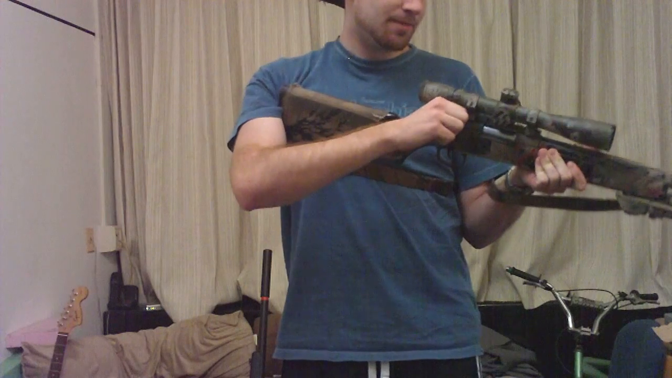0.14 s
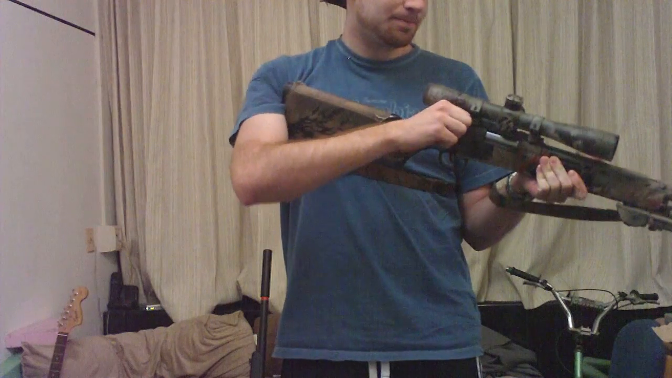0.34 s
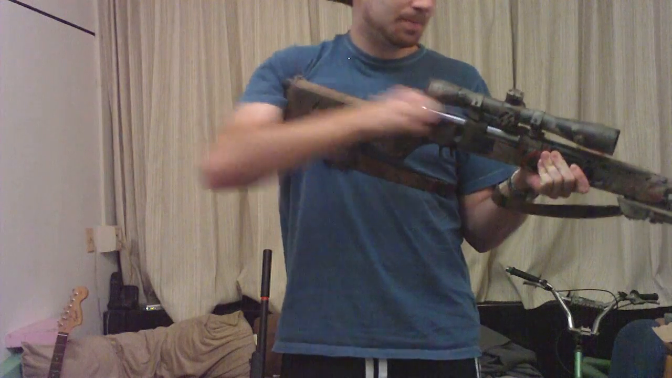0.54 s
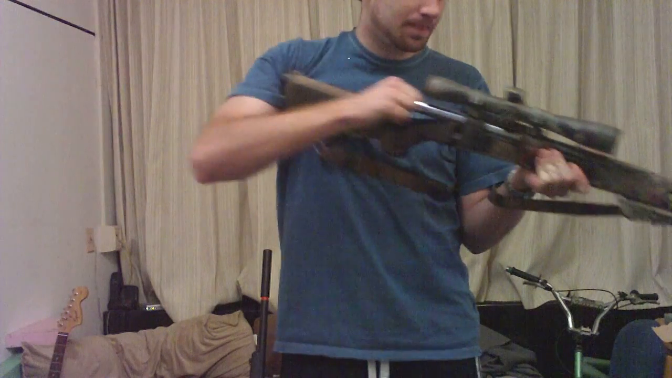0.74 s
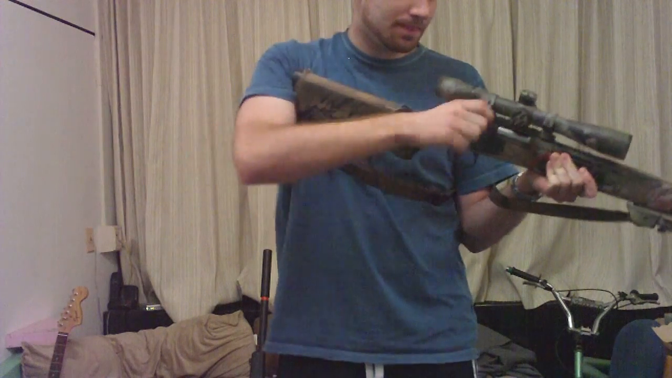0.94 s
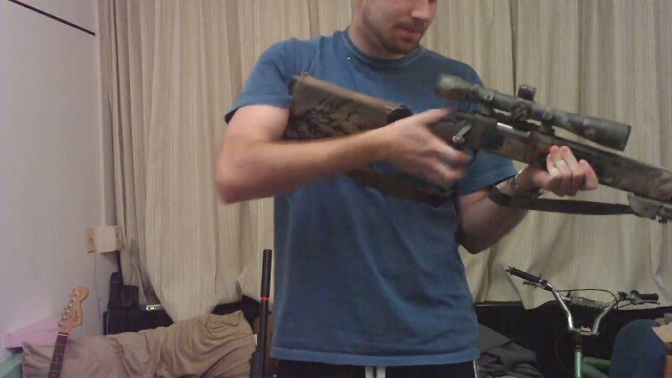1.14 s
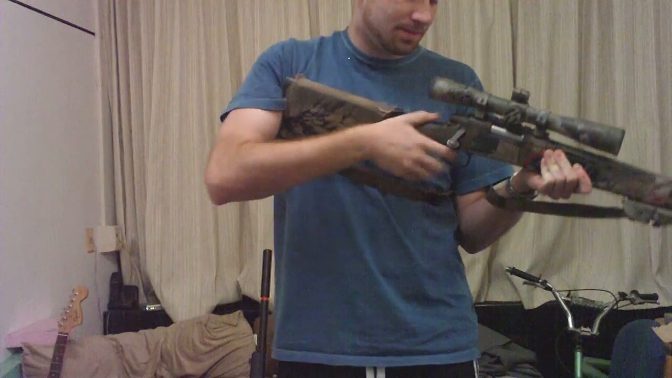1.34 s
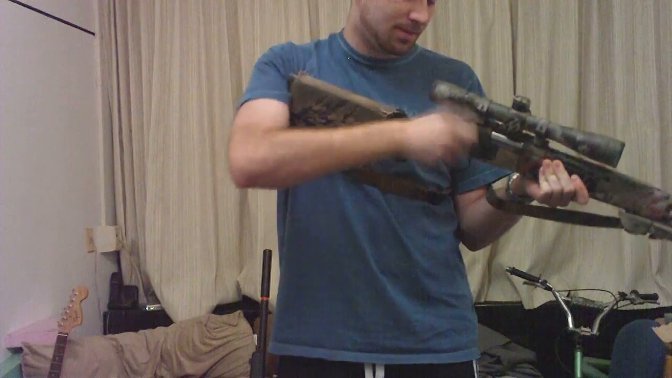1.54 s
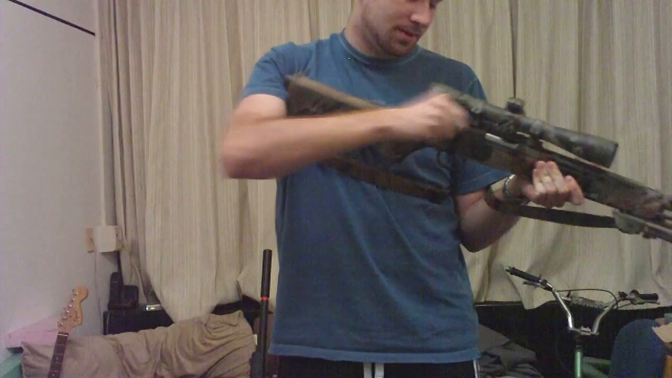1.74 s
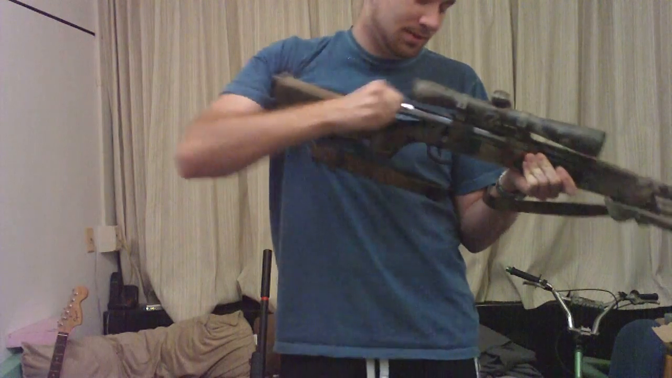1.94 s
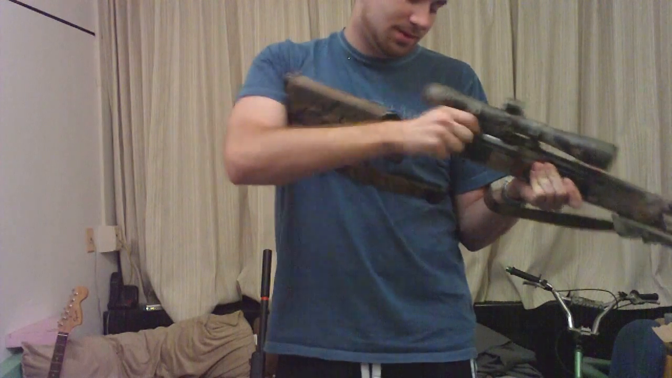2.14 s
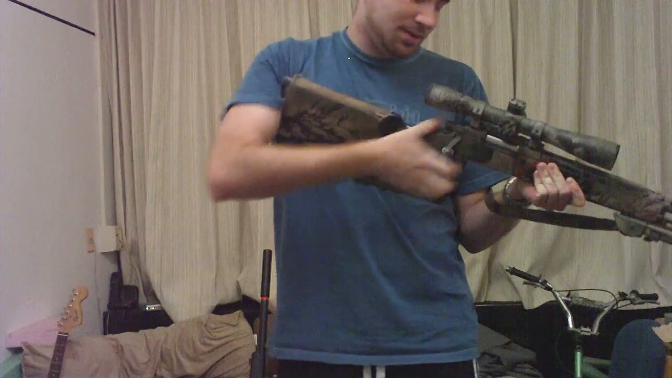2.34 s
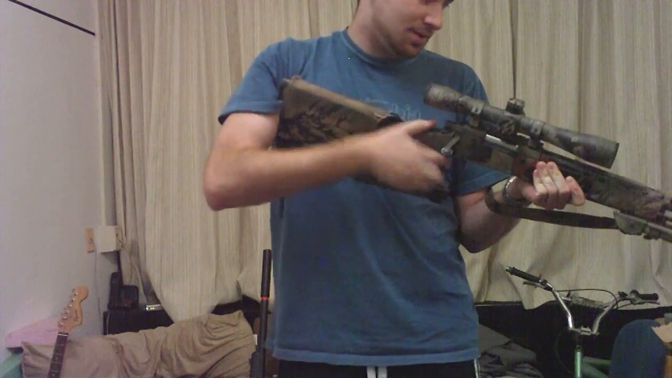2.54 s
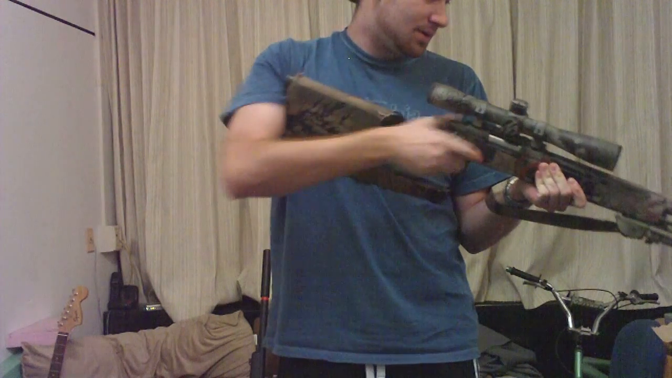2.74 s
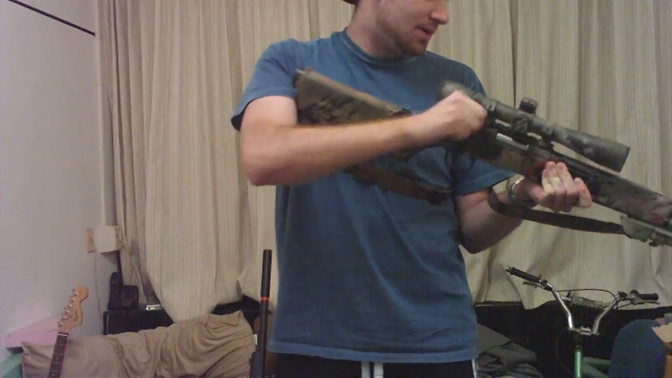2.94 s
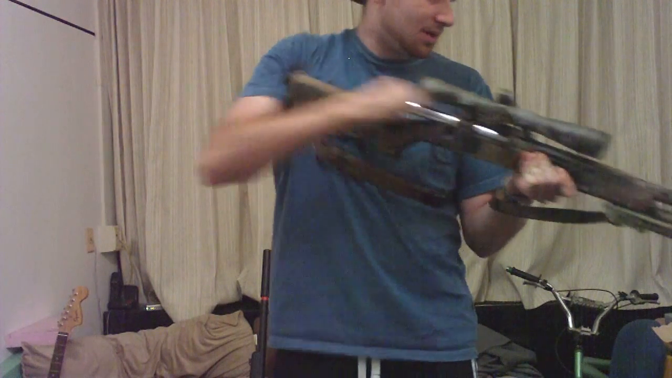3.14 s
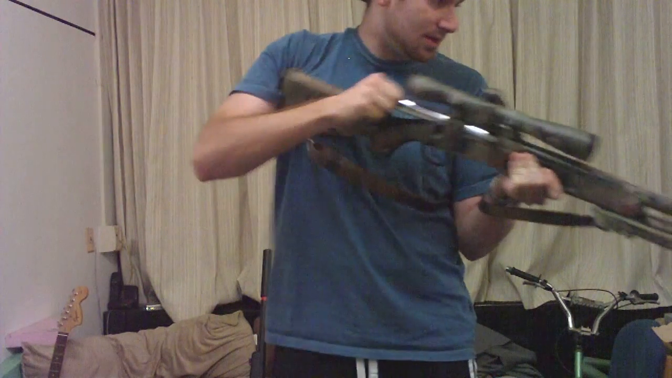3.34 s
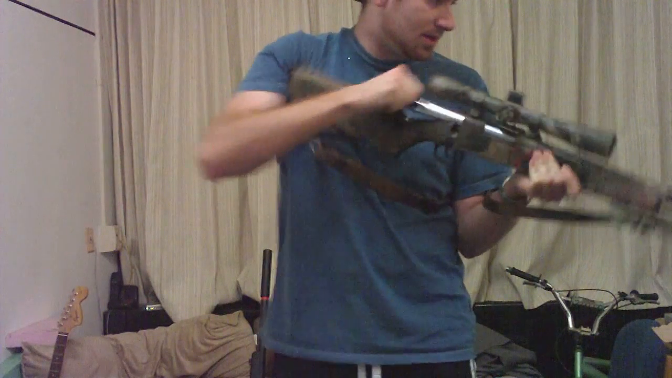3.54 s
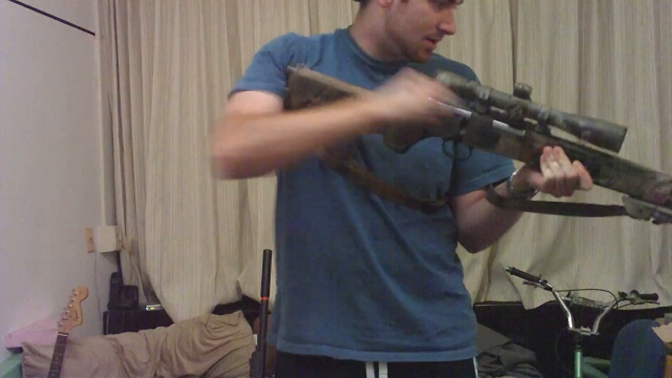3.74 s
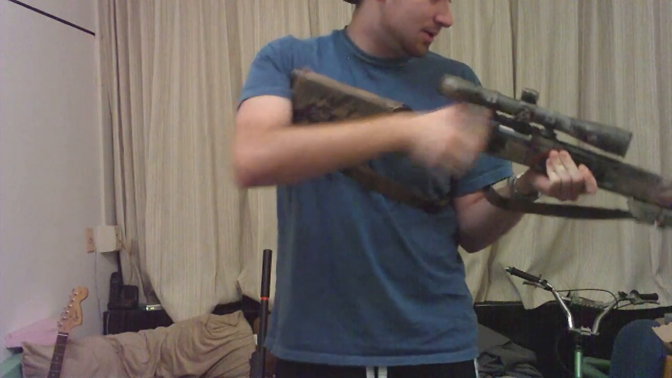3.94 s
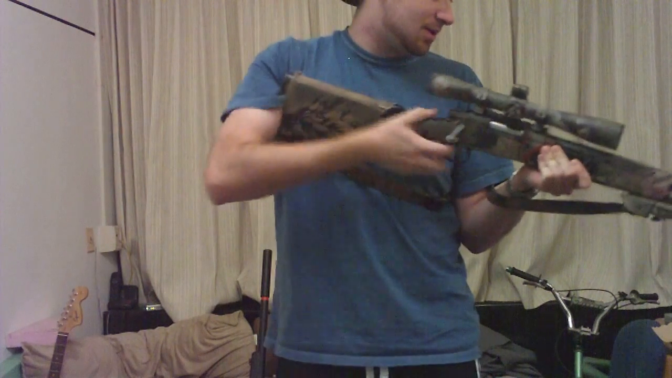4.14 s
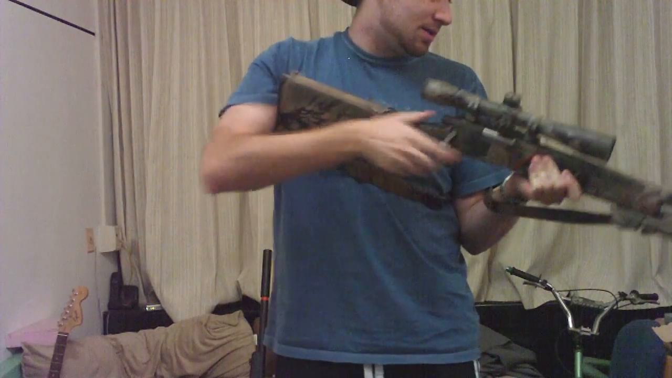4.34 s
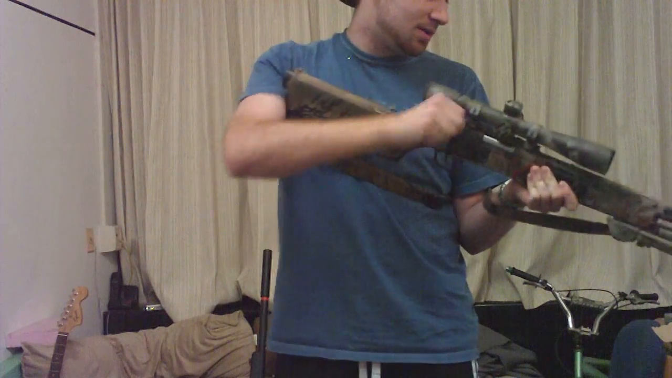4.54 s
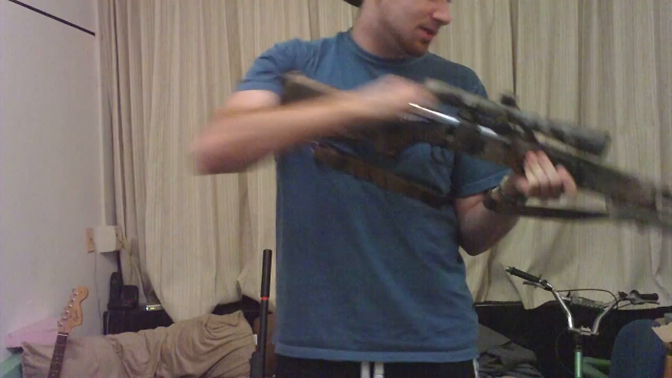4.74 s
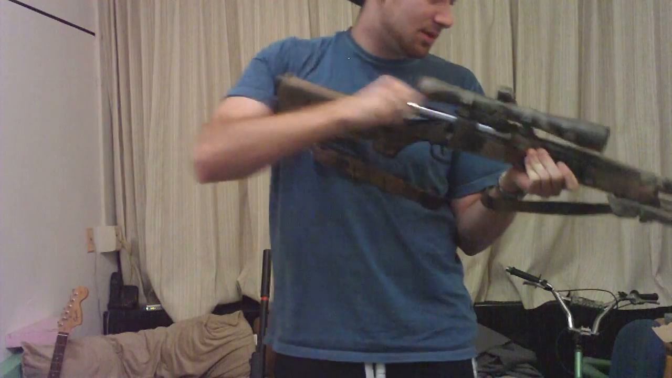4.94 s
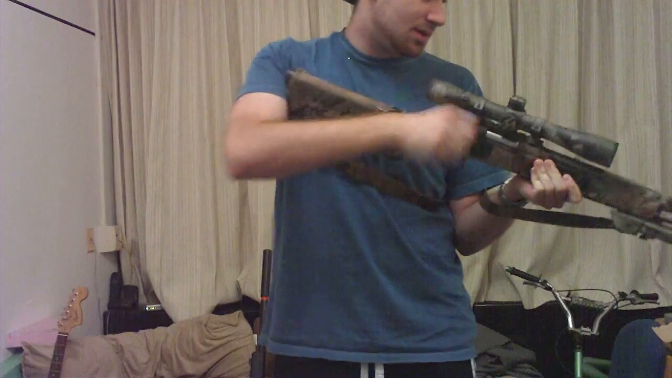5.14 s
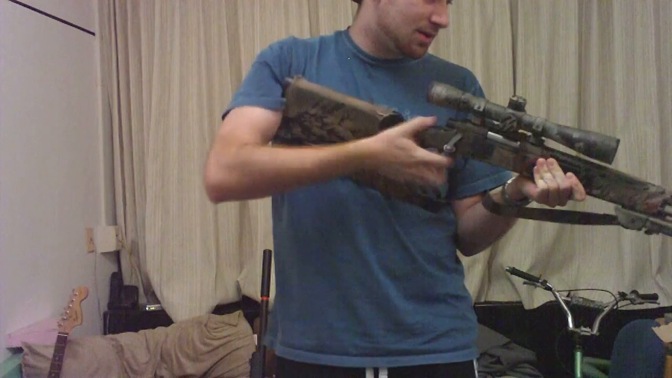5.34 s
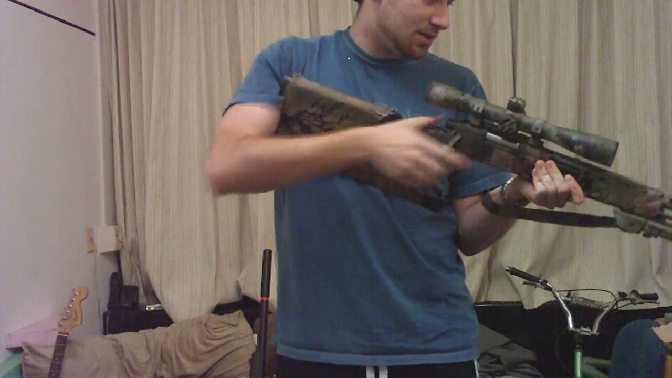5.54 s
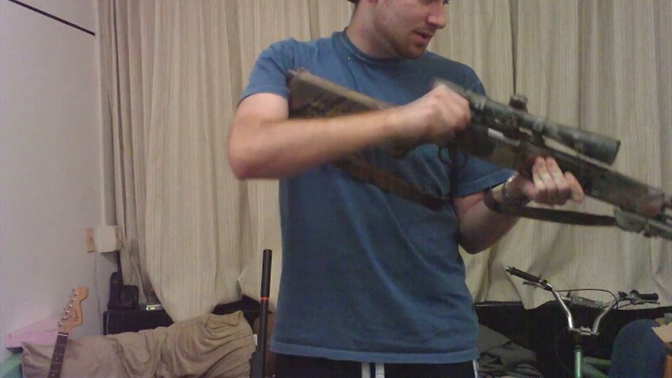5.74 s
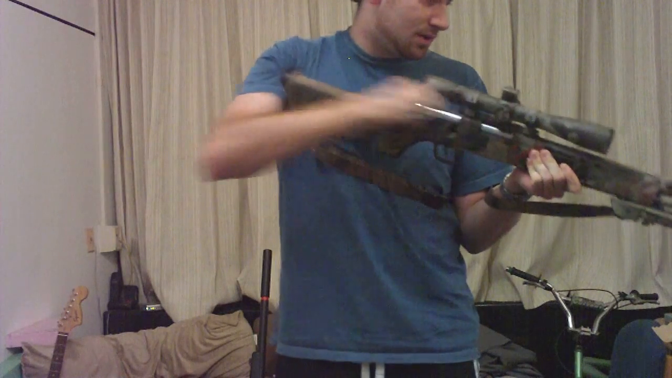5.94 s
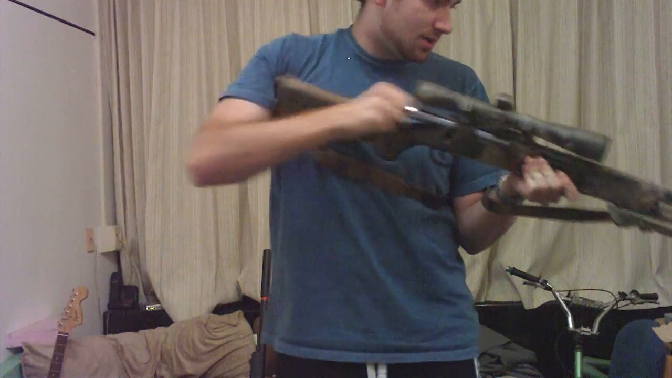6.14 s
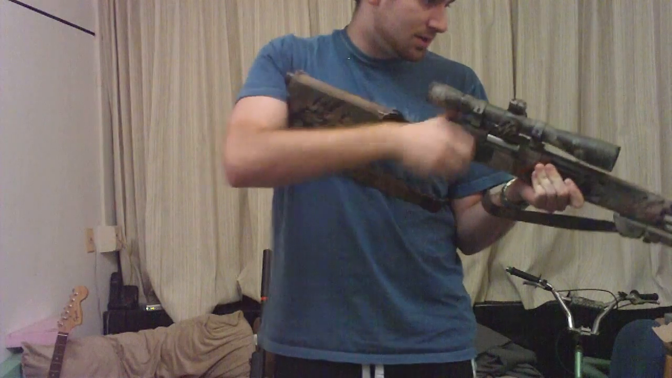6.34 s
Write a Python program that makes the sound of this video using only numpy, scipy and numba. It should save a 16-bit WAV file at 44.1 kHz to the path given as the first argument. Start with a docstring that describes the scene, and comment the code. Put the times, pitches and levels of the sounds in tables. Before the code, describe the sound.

Fast, rhythmic metal-and-plastic rifle handling close to a cheap camera microphone: bolt lifted, rasped back, clicked, pushed home and turned down with a clack, then a cracking spring-piston snap and a trigger click just after. Four shots come a little over a second apart, and a fifth cocking ends it unfired. Short room reflections, faint cloth rustle, steady hiss and a faint electronic whine surround them.

```python
"""In a curtained bedroom, a spring-powered bolt-action airsoft rifle is cocked and fired again and again.
The bolt scrapes against the spring, knocks at its stops and locks; the piston snaps forward at each shot.
Blows and scrapes are bursts of noise that make the stock and bolt ring; sleeves rustle and the walls answer.
Behind them lie house rumble, hiss and the whine of the small camera whose microphone hears it all."""
import sys
import numpy as np
from scipy import signal
from scipy.fft import rfft, irfft
from scipy.io import wavfile
from scipy.ndimage import uniform_filter1d
from numba import njit

SR = 44100
rng = np.random.default_rng(int(sys.argv[2]) if len(sys.argv) > 2 else 0)


def output_pcm(signal):
    """Save a mono or channel-first signal as 16-bit PCM at the path in sys.argv[1].

    Samples are clipped to [-1, 1] before scaling.
    """
    pcm = np.clip(np.atleast_2d(signal).T, -1, 1) * 32767
    wavfile.write(sys.argv[1], SR, np.round(pcm).astype(np.int16))


N = 282397  # length of the scene [samples]


def undb(db):
    """Turn decibels into a gain."""
    return 10 ** (np.asarray(db) / 20)


def unit(x):
    """Scale to an rms of 1."""
    return x / np.sqrt(np.mean(x ** 2))


def hiss():
    """Plain white noise, as long as the scene."""
    return rng.standard_normal(N)


def colour(x, points):
    """Shape the tone by (frequency [Hz], gain [dB]) points, with a filter that never sounds early."""
    hz, db = np.transpose(points)
    bins = np.maximum(np.arange(len(x) // 2 + 1) * SR / len(x), 1)
    log_gain = np.interp(np.log(bins), np.log(hz), db) * np.log(10) / 20
    ceps = irfft(log_gain, len(x))
    # fold the cepstrum so that the response starts at time zero
    ceps[1:len(x) // 2] *= 2
    ceps[len(x) // 2 + 1:] = 0
    return irfft(rfft(x) * np.exp(rfft(ceps)), len(x))


def band(x, hz, width_hz):
    """One resonance, with gain 1 at its centre."""
    return signal.lfilter(*signal.iirpeak(hz, hz / width_hz, SR), x)


def band_twice(x, hz, width_hz):
    """The same resonance twice over, for steeper sides, scaled to rms 1."""
    return unit(band(band(x, hz, width_hz), hz, width_hz))


@njit
def glide(x, hz, width):
    """A resonance whose centre moves: a state-variable band-pass filter."""
    y, b, l = np.empty(len(x)), 0., 0.
    for i in range(len(x)):
        g, k = np.tan(np.pi * hz[i] / SR), width / hz[i]
        v = (b + g * (x[i] - l)) / (1 + g * (g + k))
        b, l, y[i] = 2 * v - b, l + 2 * g * v, k * v
    return y


def ring(force, shape):
    """Make an object ring: convolve the force with its impulse response."""
    return signal.fftconvolve(force, shape)[:len(force)]


def walk(rate):
    """Slow random wander: levels held for 1 / rate seconds, then smoothed twice."""
    k = int(SR / rate)
    steps = np.repeat(rng.standard_normal(N // k + 1), k)
    return uniform_filter1d(uniform_filter1d(steps, k), k)[:N]


def grit(spread_db):
    """Many tiny contacts of uneven size, rms 1."""
    return unit(hiss() * undb(spread_db * rng.exponential(size=N)))


def rifle():
    """Sum the rifle's sounds; so slim an object sends out little bass from its blows and strokes."""
    slim = signal.butter(4, 275, "high", fs=SR, output="sos")
    return signal.sosfilt(slim, hits() + strokes() + cylinder_head()) + barrel_puff() + recoil()


# The shots: (time of the slam [s], crack [dB], stock ring [dB re crack], bolt ring [dB re crack])
SHOTS = [(1.3135, -7, -14, -19.5), (2.576, -7.5, -11.5, -18), (4.234, -7.5, -12, -18),
         (5.4461, -8, -13.5, -14)]
# Blows inside one shot, from sear release over piston slam to rebounds:
# (time from the slam [ms], level [dB re the shot's crack], rise [ms], contact [ms])
PISTON = [(-6, -9, 1.4, 9.9), (-3.5, 0, 0.2, 1.5), (0.5, -6, 1.5, 3.8), (7, -1, 0.49, 3),
          (17, -22, 0.79, 15), (42.5, -1.5, 1, 3.3), (61, -12.5, 2.32, 10.4)]
SPRING_DB, SPRING_T60_S = -14, 0.39  # level re the shot's crack, time to fade by 60 dB


def shot_blows():
    """Each shot is a chain of piston blows, then the mainspring rattling in the cylinder."""
    rows = []
    spring_contact_ms = SPRING_T60_S * 1000 / np.log(1000)
    for s, db, stock_db, bolt_db in SHOTS:
        for ms, blow_db, rise, contact in PISTON:
            rows.append((s + ms / 1000, db + blow_db, stock_db, bolt_db, 2000, rise, contact))
        rows.append((s, db + SPRING_DB, stock_db, bolt_db, 1800, 3, spring_contact_ms))
    return rows


# Each kind of knock in the bolt cycle has one voice: (stock ring [dB re crack], rise [ms], contact [ms])
# and its rows: (time [s], crack [dB], bolt ring [dB re crack], bolt ring centre [Hz])
HANDLE_TICK = (-35, 0.54, 5.1), [(0.4534, -45, -6, 2520), (1.6434, -37.5, 0.5, 4330),
               (2.9309, -34, -3, 4160), (4.593, -37.5, -2, 4300), (5.7943, -29, -19, 3250)]
HANDLE_UP = (-4, 1.45, 3.55), [(1.6661, -23.5, -27, 1240), (2.9664, -35.5, -0.5, 1660),
             (4.6186, -27, -18, 1720), (5.8108, -25.5, -14, 1085)]
BOLT_FREE = (-17, 0.9, 11), [(0.5162, -32, -20, 3250), (1.8305, -25.5, -8, 3060),
             (3.1365, -24.5, -6.5, 3330), (4.7541, -33, -10.5, 1680), (5.9648, -31, -10, 3960)]
SEAR_CATCH = (-27.5, 0.68, 3.1), [(0.6774, -9, -16, 1240), (1.9075, -19.5, -7.5, 3170),
              (1.9422, -13.5, -7.5, 4380), (3.261, -13.5, -8, 3480), (4.8424, -17, -18, 3900),
              (4.868, -8.5, -8, 3870), (6.0659, -16.5, -13, 2670), (6.082, -10, -11, 2800)]
REAR_RELEASE = (-76, 0.92, 4.64), [(0.7828, -14, -10, 1370), (2.0379, -11.5, -10, 1520),
                (3.6307, -13.5, -9, 1550), (3.7315, -17, -8.5, 2610), (4.9574, -16.5, -11.5, 1680),
                (6.1771, -15, -15.5, 1590)]
LUG_MEET = (-54, 1, 11.1), [(0.9412, -18.5, -10.5, 3270), (2.1742, -20, -15, 2730),
            (3.8664, -14.5, -6.5, 3470), (5.1072, -21.5, -8.5, 2020), (6.3197, -19, -11, 1710)]
BOLT_HOME = (-22.5, .5, 4.1), [(0.9577, -13, -13, 1250), (2.1875, -27.5, 2.5, 3640),
             (3.8787, -9.5, -19, 2850), (3.8849, -14.5, -12, 1240), (5.1232, -11.5, -13.5, 3250),
             (6.335, -10, -14.5, 3020)]
HANDLE_DOWN = (-3, 0.8, 4.1), [(1.111, -7.5, -17, 2400), (2.3472, -7, -16.5, 2940),
               (4.044, -7.5, -25.5, 1800), (5.2774, -10.5, -12.5, 2500)]
TRIGGER_RESET = (-49, 0.53, 3.75), [(1.4508, -15, -16, 1670), (2.6857, -15, -15, 1660),
                 (4.3634, -13, -17.5, 1710), (5.5831, -14.5, -16.5, 1635)]
LOOSE_PART = (-14, .45, 4.4), [(1.2338, -40, -6, 1710), (1.6024, -45, -10, 2570),
              (2.0093, -29.5, -18, 2800), (2.1163, -31, -15, 1520), (2.4267, -32, -6.5, 1720),
              (3.3401, -33, -8, 1350), (3.6584, -22.5, -23, 1440), (3.8214, -35, -20, 3830),
              (4.5194, -48, -11, 1550), (5.746, -42.5, -14, 1710), (5.9474, -45, -4, 1730)]
# Light grazes of a part on its seat: (time [s], crack [dB])
TOUCHES = [(0.7795, -21), (1.102, -38), (2.036, -14.5), (2.3423, -34), (2.527, -49), (2.957, -33),
           (3.627, -19), (3.729, -23.5), (4.033, -40), (4.614, -37), (4.954, -24.5), (5.266, -36),
           (5.342, -25.5), (6.175, -23)]


def cycle_blows():
    """Knocks and light touches as the bolt is worked, each kind with its own hardness."""
    kinds = (HANDLE_TICK, HANDLE_UP, BOLT_FREE, SEAR_CATCH, REAR_RELEASE,
             LUG_MEET, BOLT_HOME, HANDLE_DOWN, TRIGGER_RESET, LOOSE_PART)
    rows = [(s, db, -25, -9, 2500, .8, 2.5) for s, db in TOUCHES]
    for (stock_db, rise, contact), table in kinds:
        rows += [(s, db, stock_db, bolt_db, hz, rise, contact) for s, db, bolt_db, hz in table]
    return rows


GRIP_T60_S = .014  # hands and shoulder let no mode ring longer


def modes_of(table, gain=1, shift=1):
    """How an object answers a kick: damped sine waves added up, unit energy."""
    hz, db, t60 = np.transpose(table)[:, :, None]
    t = np.arange(SR // 20) / SR
    fade = 1000. ** (-t / np.minimum(t60, GRIP_T60_S))
    shape = np.sum(gain * undb(db) * np.sin(2 * np.pi * hz * shift * t) * fade, axis=0)
    return shape / np.sqrt(np.sum(shape ** 2))


# Ringing modes of the stock: (frequency [Hz], relative level [dB], 60 dB fade before the grip's limit [s])
STOCK = [(313, -58, 0.016), (432, -28, 0.059), (530, -5.5, 0.014), (630, 5.5, 0.0067), (800, -33, 0.025),
         (939, 23.5, .03), (1148, 14.5, 0.016)]


def stock_ring(force):
    """The stock rings at its own fixed pitches."""
    return ring(force, modes_of(STOCK))


# Ringing modes of the bolt: (frequency [Hz], relative level [dB], 60 dB fade before the grip's limit [s])
BOLT = [(1330, 20, 0.018), (1640, 18.5, 0.014), (1773, 5.5, 0.059), (2205, 14, 0.0041), (2560, 7.5, 0.045),
        (3270, 14.5, 0.06), (3700, -23.5, 0.045), (4010, -0.5, 0.06), (4096, 7.5, 0.031), (5380, 9, 0.06)]
REACH_OCT = 0.58  # how far from its ring centre a blow still wakes the bolt's modes [octaves]
DETUNE = .02  # each blow lands elsewhere and shifts the modes by about this share


def bolt_ring(force, centre_hz):
    """The bolt rings mostly at the pitches near the place the blow lands."""
    octaves = np.log2(np.array(BOLT)[:, :1] / centre_hz)
    near = 0.024 + np.exp(-(octaves / REACH_OCT) ** 2)
    shift = 1 + DETUNE * rng.standard_normal((len(BOLT), 1))
    return ring(force, modes_of(BOLT, near, shift))


# Tone of the bare crack: (frequency [Hz], relative level [dB])
CRACK = [(800, -79), (1500, -15.5), (2200, -4), (3000, 1), (4200, -0.5), (5500, 3), (6500, 0.5), (7600, -2),
         (8600, -7), (10500, -12), (13000, -23), (15500, -32)]
CHATTER_DB, CHATTER_MS = -20.5, 14  # loose parts rattle on after each blow: level, decay time
STRIKE_DB = 16  # first instant of contact, a single kick to the modes, re the blow
COUPLE_DB = -8.5  # the stock hands part of its blow on to the bolt


def hits():
    """Every blow is a burst of rough contact that cracks, rings the stock and rings the bolt."""
    crack, stock, bolt = np.zeros((3, N + SR))
    ms = np.arange(SR // 2) * 1000 / SR
    contact = np.tile(grit(2.54), 2)
    rattle = np.tile(unit(undb(7.0 * walk(250))), 2)
    for s, db, stock_db, bolt_db, hz, rise_ms, contact_ms in shot_blows() + cycle_blows():
        at = slice(int(s * SR), int(s * SR) + len(ms))
        chatter = undb(CHATTER_DB) * np.exp(-ms / CHATTER_MS) * rattle[at]
        fade = np.exp(-ms / contact_ms) + chatter
        force = undb(db) * (1 - np.exp(-ms / rise_ms)) * fade * contact[at]
        crack[at] += force
        # the kick drives only the modes, not the crack
        force[int(rise_ms * SR / 1000)] += undb(db + STRIKE_DB)
        stock[at] += undb(stock_db) * force
        bolt_gain = undb(bolt_db) + undb(stock_db + COUPLE_DB)
        bolt[at] += bolt_gain * bolt_ring(force, hz)
    return (undb(2.0) * colour(crack, CRACK) + undb(-6.5) * stock_ring(stock) + undb(0.5) * bolt)[:N]


# Tone of the sliding bolt: (frequency [Hz], relative level [dB])
SCRAPE = [(710, -30.5), (1200, -11), (2460, -14), (3010, -4), (3580, -14.5), (3900, -5.5), (4340, -12.5),
          (7730, -14), (8790, -13), (12000, -27), (15500, -45)]
# Cylinder resonances woken by sliding: (frequency [Hz], width [Hz], level [dB re scrape])
CYLINDER = [(1265, 210, -18.5), (4900, 250, -38), (8550, 160, -25)]


def scrape_sound(slip, spring_hz):
    """Uneven grip heard through the metal, a moving spring ring and the cylinder."""
    scrape = unit(colour(slip, SCRAPE))
    spring = undb(-7.5) * unit(glide(slip, spring_hz, 300.0))
    cylinder = sum(undb(db) * unit(band(slip, hz, width)) for hz, width, db in CYLINDER)
    return scrape + spring + cylinder


# Bolt pulled back against the spring:
# (start [s], end [s], scrape level once moving [dB], scrape level at the end [dB])
PULLS = [(0.505, 0.665, -40, -31), (1.812, 1.93, -35.5, -30.5), (3.115, 3.25, -34.5, -32.5),
         (4.735, 4.855, -34, -30.5), (5.95, 6.055, -35.5, -32)]
# Bolt pushed forward with the spring held: same columns
PUSHES = [(0.85, 0.93, -41, -42), (2.09, 2.162, -41, -44.5), (3.8, 3.856, -38, -42.5),
          (5.015, 5.097, -39.5, -42), (6.225, 6.308, -39.5, -46.5)]
# How a stroke goes: (share of it spent running up, held within 0.1 to 0.7; level where the run-up starts
# [dB re moving]; spring ring at start [Hz], at end [Hz]; stock share [dB re scrape], the same at the stop)
PULL_LAW = (0.29, -23, 3150, 3750, -15.5, -14)
PUSH_LAW = (1.5, -21.5, 3700, 3552, -20, 0.5)
# Shares of a stroke between which the spring ring moves to its end pitch: (from, to)
CLIMB = (0.33, 0.64)
STOP_S = 0.014  # the stroke runs on this long until the bolt meets its stop
SEAT_S = 0.032  # for this long before the stroke's end the bolt bears more on the stock
SLIP_DB, SLIP_HZ, SLIP_GRIT_DB = 4., 200, 2.  # how unevenly the sliding bolt grips: swing, rate, grit


def strokes():
    """The bolt slides in the receiver: a gritty scrape that also shakes the stock a little."""
    t = np.arange(N) / SR
    gain, stock, spring_hz = np.zeros(N), np.zeros(N), np.full(N, 3300.)
    for table, law in ((PULLS, PULL_LAW), (PUSHES, PUSH_LAW)):
        run_up, below_db, from_hz, to_hz, share_db, stop_db = law
        for start, end, moving_db, end_db in table:
            inside = (t >= start) & (t < end + STOP_S)
            now, length = t[inside], end - start
            moving = start + np.clip(run_up, .1, .7) * length
            db = np.interp(now, [start, moving, end], [moving_db + below_db, moving_db, end_db])
            gain[inside] = undb(db)
            stock[inside] = undb(db + np.interp(now, [end - SEAT_S, end], [share_db, stop_db]))
            spring_hz[inside] = np.interp(now, start + np.sort(CLIMB) * length, [from_hz, to_hz])
    # the grip comes and goes
    slip = unit(undb(SLIP_DB * walk(SLIP_HZ)) * grit(SLIP_GRIT_DB))
    return gain * scrape_sound(slip, spring_hz) + stock_ring(stock * slip)


def after_shots(db, fade_s):
    """A level that jumps at each shot and dies away."""
    out = np.zeros(N)
    for s, shot_db, *_ in SHOTS:
        start = int(s * SR)
        out[start:] += undb(shot_db + db) * np.exp(-np.arange(N - start) / SR / fade_s)
    return out


def cylinder_head():
    """The cylinder head rings brightly as the piston lands: a short band of noise."""
    return after_shots(1, 0.0083) * unit(band(hiss(), 7360, 1100))


def barrel_puff():
    """Air pushed out of the barrel: a soft, low burst of noise."""
    return after_shots(-15, 0.04) * band_twice(hiss(), 270, 460)


def recoil():
    """The held rifle jolts as a whole: a dull thud of very low noise."""
    return after_shots(-32.5, 0.098) * band_twice(hiss(), 66.4, 27)


# Hands, sleeve and sling rustle as the rifle is worked: (time [s], level before the flutter [dB])
RUSTLE = [(0.4, -75), (0.699, -63.5), (1.69, -61.5), (1.87, -53.5), (2.02, -54), (2.44, -80), (2.54, -63),
          (3.67, -77), (3.81, -47.5), (3.91, -60), (4.08, -59), (4.26, -67), (4.69, -68), (4.96, -49),
          (5.4, -70), (5.81, -56), (6.01, -79), (6.18, -48), (6.4, -51)]


def rustle():
    """Cloth and skin rub: gritty noise with a patchy, fluttering level."""
    s, db = np.transpose(RUSTLE)
    level = undb(np.interp(np.arange(N) / SR, s, db, left=-120) + 7.1 * walk(40))
    tone = [(300, -23.5), (1000, 2.5), (1700, -2.5), (4000, 0.5), (8000, -6.0), (14000, -42)]
    return level * unit(colour(grit(2.), tone))


# How the room rings on: (frequency [Hz], time to fade by 60 dB [s], relative tail level [dB])
ROOM = [(104.7, 0.11, -12), (304, 0.28, 0.5), (1060, 0.21, 7.5), (3200, 0.19, 0.5), (6830, 0.2, -1.7),
        (14000, 0.15, 4)]
ROOM_DB, ROOM_GAP_MS = -4.5, 3.852  # tail level re direct sound, silence before the tail
SWAY_S = .2  # the rifle moves, so every this long the walls answer differently


def room(x):
    """Direct sound plus a dense noise tail; each pitch range fades at its own pace."""
    t, tails, hop = np.arange(SR // 2) / SR, 0, int(SWAY_S * SR)
    hz, t60, db = np.transpose(ROOM)
    for centre in 90 * 2 ** np.arange(0, 7.6, .5):
        noise = band(rng.standard_normal((N // hop + 2, len(t))), centre, centre / 3)
        fade_s, tail_db = (np.interp(np.log(centre), np.log(hz), c) for c in (t60, db))
        tails = tails + undb(tail_db) * noise * 1000. ** (-t / fade_s)
    tails = tails * (t > ROOM_GAP_MS / 1000)
    # overlapping pieces of sound each get their own tail
    padded, wet = np.pad(x, (hop, 2 * hop)), np.zeros(N + 3 * hop + SR)
    window = np.sqrt(np.hanning(2 * hop))
    for k, tail in enumerate(tails):
        start = k * hop
        part = signal.fftconvolve(padded[start:start + 2 * hop] * window, tail)
        wet[start:start + len(part)] += part / np.sqrt(np.sum(tail ** 2))
    return x + undb(ROOM_DB) * wet[hop:hop + N]


# Tone of the background: (frequency [Hz], relative level per Hz [dB])
HUSH = [(12, -20.5), (20, 2.5), (42, -9), (64, -17), (101, -18), (202, -29), (238, -24.5), (274, -30),
        (3450, -47), (4810, -46), (6720, -49.5), (7950, -38), (9390, -50), (12400, -55.5), (15500, -57)]


def hush():
    """House rumble that swells around 30 Hz, with microphone hiss: shaped noise."""
    bed = unit(colour(hiss(), HUSH))
    swell = undb(4.0 * walk(6.3)) - 1
    return undb(-48) * (bed + band(bed, 30, 30) * swell)


# Camera tones, highest last: (frequency [Hz], peak level before a slight wander [dB])
WHINE = [(231.5, -70.5), (4861, -79.5), (7822, -67), (7854, -78), (7881, -81), (11989, -70)]
# Throbbing hiss bands: (frequency [Hz], width [Hz], level before the throb [dB])
BUZZ = [(4750, 500, -74), (8500, 900, -79.5)]
BEAT_HZ, BEAT_S = 15, .05  # the highest tone switches on and off: rate, time offset


def whine():
    """The camera's sine tones, the highest one beating, and hiss that throbs twice per beat."""
    t = np.arange(N) / SR
    tones = [undb(db + 1.3 * walk(16)) * np.sin(2 * np.pi * hz * t) for hz, db in WHINE]
    beat = 2 * np.pi * BEAT_HZ * (t - BEAT_S)
    on = uniform_filter1d(1. * (np.sin(beat) > 0), size=200)
    buzz = sum(undb(db) * band_twice(hiss(), hz, width) for hz, width, db in BUZZ)
    return sum(tones[:-1]) + on * tones[-1] + buzz * (1 + .6 * np.cos(2 * beat))


def side_rumble():
    """Faint, mostly low noise that differs between left and right."""
    tone = [(20, 0.1), (40, -3), (100, -13), (250, -19), (500, -28), (1000, -38), (5000, -40), (15000, -41)]
    return undb(-64) * unit(colour(hiss(), tone))


def scene():
    """One microphone capsule feeds both channels; only the faint side rumble differs."""
    mid = room(rifle() + rustle()) + hush() + whine()
    side = side_rumble()
    return np.array([mid + side, mid - side])


def record(dry):
    """The input flattens peaks above 0.95 and cuts the treble above 15.4 kHz."""
    top_cut = signal.ellip(8, .2, 70, 15400, fs=SR, output="sos")
    return signal.sosfilt(top_cut, np.clip(dry, -.95, .95))


dry = scene()
out = record(dry)
output_pcm(out)
```